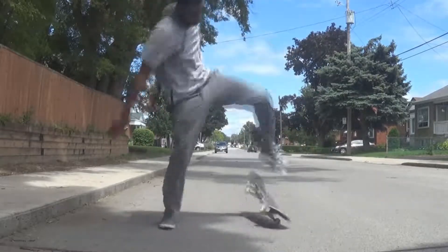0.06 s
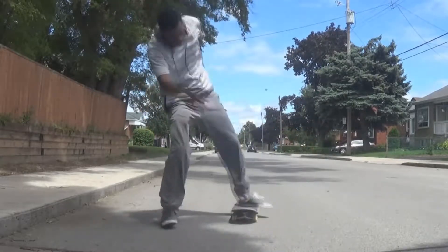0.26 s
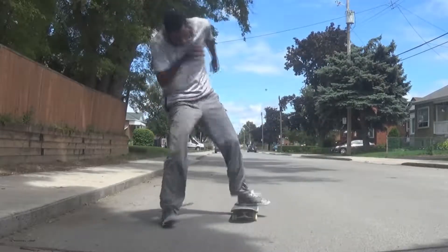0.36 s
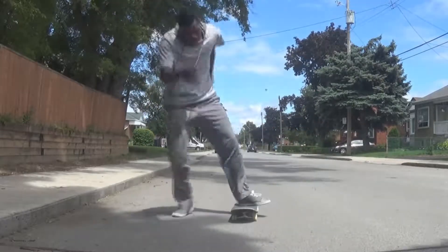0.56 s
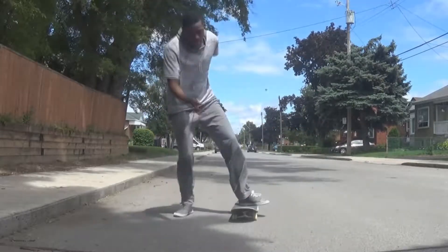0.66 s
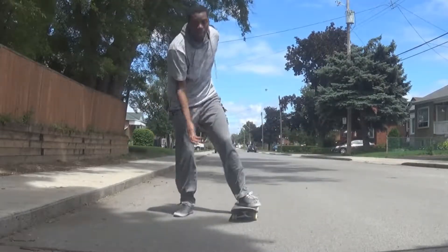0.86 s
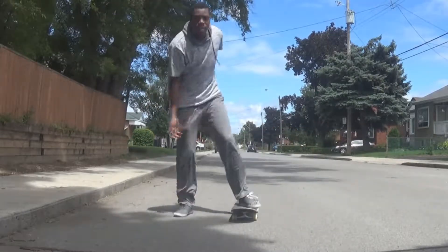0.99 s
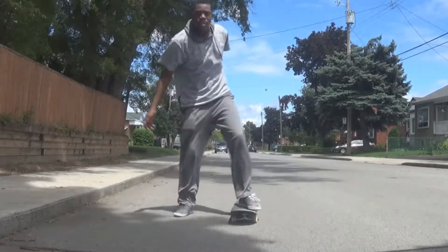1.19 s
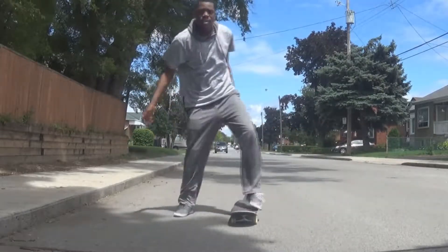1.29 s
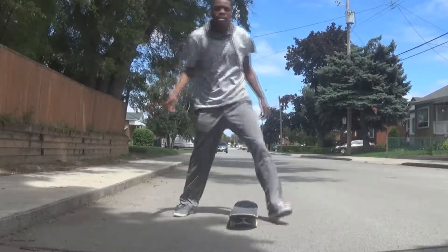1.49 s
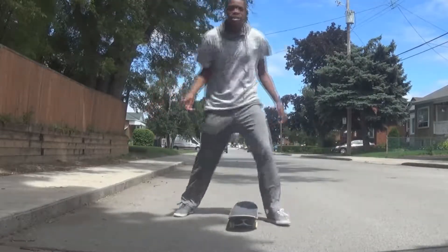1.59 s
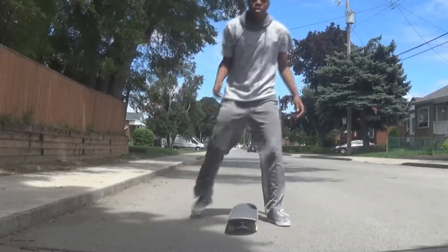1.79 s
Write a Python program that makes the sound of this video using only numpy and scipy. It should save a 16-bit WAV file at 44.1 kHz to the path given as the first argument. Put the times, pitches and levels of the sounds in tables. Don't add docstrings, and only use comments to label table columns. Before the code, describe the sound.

Wooden skateboard clatter on a street, followed by faint sole scrapes and quiet rolling with loose knocks

```python
import sys
import numpy as np
from scipy import signal
from scipy.fft import rfft, irfft, next_fast_len
from scipy.io import wavfile
from scipy.ndimage import uniform_filter1d

SR = 44100
rng = np.random.default_rng(int(sys.argv[2]) if len(sys.argv) > 2 else 0)


def file_out(sig):
    cols = np.atleast_2d(sig).T
    lim = np.clip(cols, -1, 1)
    pcm = np.round(lim * 32767).astype(np.int16)
    wavfile.write(sys.argv[1], SR, pcm)


def volts(x):
    e = np.asarray(x, float) / 20
    return 10 ** e


N = 81585


def unit(x):
    return x / np.sqrt(np.mean(x ** 2) + 1e-18)


def peak(x):
    return x / np.abs(x).max()


def add(out, start_s, x):
    i = int(start_s * SR)
    out[i:i + len(x)] += x[:len(out) - i]


def filtered(x, order, hz, kind="low"):
    return signal.sosfilt(signal.butter(order, hz, kind, fs=SR, output="sos"), x)


def colour(x, table):
    f = np.fft.rfftfreq(1024, 1 / SR)
    hz, db = np.transpose(table)
    cepstrum = irfft(np.log(volts(np.interp(np.log(f + 1), np.log(hz), db))))
    cepstrum[1:512] *= 2
    cepstrum[513:] = 0
    response = irfft(np.exp(rfft(cepstrum)))
    return signal.fftconvolve(x, response)[:len(x)]


def ring(x, hz, t60):
    r = np.exp(-np.log(1000) / (max(t60, .002) * SR))
    angle = 2 * np.pi * hz / SR
    gain = np.sin(angle) * 2 * np.sqrt(1 - r)
    return signal.lfilter([gain], [1, -2 * r * np.cos(angle), r * r], x)


def shape(t, rise, hold, fall):
    return np.clip(t / rise, 0, 1) ** 2 * np.exp(-np.clip(t - rise - hold, 0, None) / fall)


def clicks(count, rate, spread_db):
    u = rng.random((count, 3))
    hit = u[:, 0] < rate / SR
    size = volts(-min(spread_db, 3) * np.log(u[:, 2] + .01))
    return unit(hit * np.sign(u[:, 1] - .5) * size)


def walk(rate):
    k = int(SR / rate)
    steps = np.repeat(rng.standard_normal(N // k + 1), k)
    return 1.3 * uniform_filter1d(uniform_filter1d(steps, k), k)[:N]


# start in seconds, level in dB, chatter length in seconds,
# contact pitch (brightest deck mode) in Hz, grit level in dB.
STRIKES = [(0.1933, -51, 0.002, 3040, 7), (.202, -21, 0.011, 1850, -4.5), (0.214, -22, 0.0057, 1680, -8),
           (0.224, -29, 0.017, 1170, -2), (0.2496, -20, 0.0027, 1600, -9), (.254, -16, 0.0068, 2300, -20),
           (0.262, -21, 0.0077, 610, -6.5), (0.276, -29, 0.011, 1220, 4.5), (0.298, -23.5, 0.016, 840, -6),
           (0.3192, -23, 0.011, 1580, -2.5), (0.331, -19, 0.012, 1470, -13), (.353, -18, 0.0052, 790, -1.5),
           (.365, -19.5, 0.02, 1220, -6), (0.386, -24, 0.015, 600, -3.5), (0.393, -21, 0.0062, 1770, -24),
           (.404, -22.5, 0.0094, 1370, -10.5), (0.42, -36, 0.013, 1300, 3.5)]
# frequency in Hz, level in dB, t60 in seconds.
DECK_MODES = [(320, -7, .035), (436, -1, .04), (657, -2, .03), (780, -5, .025), (1050, 0, .03),
              (1240, -3, .02), (1560, -3, .022), (1735, -3, .025), (1900, -2, .015), (2110, -3, .015),
              (2620, -3, .018), (3400, -7, .018), (3900, -9, .015), (5350, -12, .015)]
# frequency in Hz, level in dB per Hz.
GRIT_SPECTRUM = [(150, -39.5), (450, -13.5), (1900, -4), (5650, -12.5), (8000, -29.5), (12000, -24),
                 (15600, -26.5), (16500, -49)]


def blows():
    out, t = np.zeros(N), np.arange(SR // 8) / SR
    for start_s, db, hold, pitch_hz, grit_db in STRIKES:
        first_slap = volts(3.5 * np.exp(-t / .005))
        push = clicks(len(t), 3200., 3.0) * shape(t, 0.0011, hold, 0.0048) * first_slap
        deck = 0
        for (hz, mode_db, t60), (a, b) in zip(DECK_MODES, rng.standard_normal((len(DECK_MODES), 2))):
            steepness = 1.5 if hz < pitch_hz else 1
            distance = np.log2(hz / pitch_hz) / .85 * steepness
            level_db = mode_db + 2.5 * a - 9.3 * distance ** 2
            deck = deck + volts(level_db) * ring(push, hz * (1 + 0.042 * b), t60)
        snap = .5 * rng.standard_normal(len(t)) * shape(t, 0.00031, 0.00063, 0.00067)
        grit = colour(push + snap, GRIT_SPECTRUM)
        span = SR * (hold + 0.013)
        deck = deck / np.sqrt(np.sum(deck ** 2) / span)
        grit = grit / np.sqrt(np.sum(grit ** 2) / span)
        add(out, start_s, volts(db) * (deck + volts(grit_db) * grit))
    return out


# start in seconds, knock level in dB, metal tick level in dB, knock pitch in Hz.
AXLE_HITS = [(0.1993, -22.5, -17.5, 1690), (.760, -34, -56, 1425), (1.329, -47, -54, 3850),
             (1.437, -44, -47, 3840), (1.367, -43, -60, 1110), (1.414, -38, -52, 1720),
             (1.4339, -35.5, -40.5, 1610), (1.449, -37.5, -44, 2180), (1.463, -32, -41, 1640),
             (1.483, -28, -39, 1600), (1.502, -27.5, -32, 1640), (1.511, -47, -44, 712),
             (1.519, -37, -46, 1600), (1.5322, -36, -56, 1520), (1.543, -63, -39, 1575),
             (1.555, -45, -43, 1540), (1.5777, -34, -46, 1550), (1.633, -33.5, -31.5, 1674),
             (1.642, -33, -42, 1116), (1.660, -30, -36, 1535), (1.675, -41, -41.5, 1100),
             (1.721, -30, -43, 1548), (1.77, -38, -44, 1670), (1.782, -34.5, -54, 1590),
             (1.811, -42.5, -46, 890), (1.829, -40.5, -54, 1050)]
# frequency in Hz, level in dB, t60 in seconds.
AXLE_MODES = [(3880, 0, .02), (5400, -1, .008), (6600, 0, .006), (10900, -2, .005), (12500, -8, .003),
              (15000, -8, .003)]
# frequency in Hz, level in dB, t60 in seconds.
HANGER_MODES = [(712, -12, .035), (1070, -12, .03), (2150, -16, .02), (2800, -18, .015)]


def metal(push, modes, scatter_db, detune):
    out = 0
    for (hz, db, t60), (a, b) in zip(modes, rng.standard_normal((len(modes), 2))):
        out = out + volts(db + scatter_db * a) * peak(ring(push, hz * (1 + detune * b), t60))
    return out


def ticks():
    out, t = np.zeros(N), np.arange(SR // 10) / SR
    for start_s, knock_db, tick_db, knock_hz in AXLE_HITS:
        push = rng.standard_normal(len(t))
        tick = metal(push * shape(t, 0.0001, 0.00033, 0.00074), AXLE_MODES, 1.3, 0.016)
        blow = push * shape(t - .001, .001, .002, .001)
        knock = peak(ring(blow, knock_hz, .038)) + metal(blow, HANGER_MODES, 1.6, 0.021)
        add(out, start_s, volts(knock_db + 6) * peak(knock) + volts(tick_db + 8) * peak(tick))
    return filtered(out, 2, 600, "high")


# start, rise, hold and fall in seconds, level in dB.
SCUFF_STROKES = [
    (0.545, 0.0015, 0.0056, .010, -33.5),
    (0.585, 0.0074, 0.024, 0.011, -39),
    (0.638, 0.024, 0.0062, 0.0122, -28),
    (.660, .027, 0.0082, 0.0098, -24.5),
]
# first frequency in Hz, last frequency in Hz, bass share in dB.
SOLE_GLIDES = [
    (6500, 5500, -10),
    (5600, 5600, -8),
    (1300, 1900, -1),
    (1900, 3200, -1),
]


def scuffs():
    out, t = np.zeros(N), np.arange(SR // 8) / SR
    for (start_s, rise, hold, fall, db), (from_hz, to_hz, bass_db) in zip(SCUFF_STROKES, SOLE_GLIDES):
        drag = unit(colour(clicks(len(t), 9000., 1.4), GRIT_SPECTRUM))
        high = filtered(drag, 2, 4200, "high")
        grit = volts(bass_db) * (drag - high) + high
        hz = np.interp(t, [0, rise + hold + fall], [from_hz, to_hz])
        slow_noise = signal.lfilter([.04], [1, -.96], rng.standard_normal(len(t)))
        sole = slow_noise * np.sin(2 * np.pi * np.cumsum(hz) / SR)
        add(out, start_s, volts(db) * shape(t, rise, hold, fall) * (grit + volts(-7) * unit(sole)))
    return out


# time in seconds, level in dB.
ROLL_LEVEL = [(0, -41), (.12, -50), (.45, -38.5), (.62, -44.5), (.85, -53.5), (.96, -49.5), (1.1, -58.5),
              (1.25, -48.5), (1.33, -47), (1.5, -45), (1.58, -49.5), (1.65, -41), (1.72, -49), (1.79, -40),
              (1.85, -50)]


def rolling():
    road = clicks(N, 4000., 1.34)
    body = sum(volts(db) * ring(road, hz, 1.18 * t60) for hz, db, t60 in DECK_MODES[2:])
    time_s, db = np.transpose(ROLL_LEVEL)
    level_db = np.interp(np.arange(N) / SR, time_s, db) + 1.7 * walk(44.23)
    return volts(level_db) * (unit(body) + volts(-3) * unit(colour(road, GRIT_SPECTRUM)))


# start in seconds, level in dB.
GROUND_JOLTS = [
    (.255, -71),
    (0.324, -50),
    (0.353, -60),
]


def thuds():
    out, t = np.zeros(N), np.arange(SR // 10) / SR
    jolt = np.sin(2 * np.pi * 50.3 * t) * np.exp(-t / 0.0047)
    for start_s, db in GROUND_JOLTS:
        add(out, start_s, volts(db + 12) * jolt)
    return out


def echoes(board):
    t60_s, build_up_s = 0.46, 0.019
    t = np.arange(SR // 2) / SR
    tail = signal.lfilter(*signal.butter(1, 7560, fs=SR), rng.standard_normal((2, len(t))))
    tail = tail * volts(-60 * t / t60_s) * np.clip(t / build_up_s, 0, 1)
    tail = tail / np.sqrt(np.sum(tail[0] ** 2))
    return signal.fftconvolve(board[None], tail, axes=1)[:, :N] * volts(-12.5)


# frequency in Hz, level in dB per Hz.
STREET_SPECTRUM = [(22, -56), (85, -11.5), (480, -6), (850, 1), (1400, -6), (6000, -12), (7900, -23.5),
                   (15500, -25.5)]


def street():
    f, out = np.fft.rfftfreq(N, 1 / SR) + 1, 0
    hz, db = np.transpose(STREET_SPECTRUM)
    spectrum = rfft(rng.standard_normal((2, N))) * volts(np.interp(np.log(f), np.log(hz), db))
    swell = walk(4.95)
    for centre_hz in 25 * 2 ** np.arange(0, 9.6, .5):
        band = np.clip(1 - np.abs(2 * np.log2(f / centre_hz)), 0, 1)
        flicker_db = .7 * swell + 1.1 * walk(12)
        out = out + irfft(spectrum * band, N) * volts(flicker_db)
    return volts(-45.5) * unit(out)


def scene():
    board = filtered(blows() + ticks() + scuffs() + rolling(), 4, 295, "high")
    board = board + thuds()
    echo = echoes(board)
    air = street()
    mid = board + echo[0] + air[0]
    quadrature = signal.hilbert(board, next_fast_len(N)).imag[:N]
    side = volts(-13) * air[1] + volts(-10.5) * echo[1] + volts(-10) * quadrature
    side = filtered(side, 5, 10800)
    pan_db = 1
    return np.array([volts(pan_db / 2) * mid + side, volts(-pan_db / 2) * mid - side])


def top_cut(x):
    return signal.sosfilt(signal.butter(12, 16990, fs=SR, output="sos"), x)


def record(dry):
    dip_s, half_width_s, dip_db, ceiling = 1.2928, .008, -15, .9
    dip = np.clip(1 - np.abs(np.arange(N) / SR - dip_s) / half_width_s, 0, 1)
    soft = ceiling * np.tanh(dry * volts(dip_db * dip) / ceiling)
    mix = filtered(soft, 10, 15700)
    return top_cut(mix)


dry = scene()
out = record(dry)
file_out(out)
```